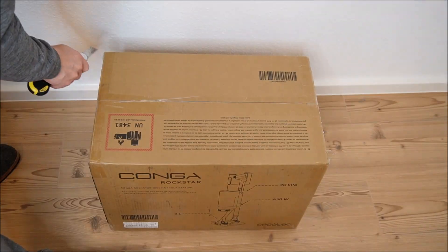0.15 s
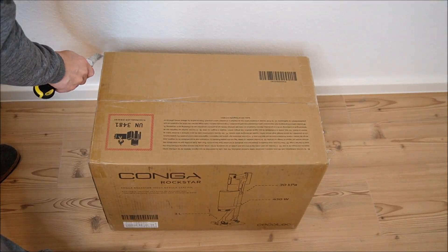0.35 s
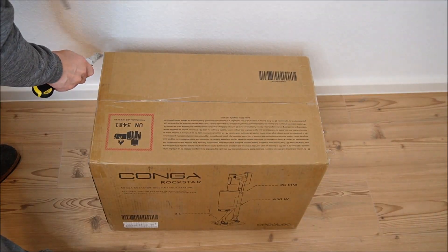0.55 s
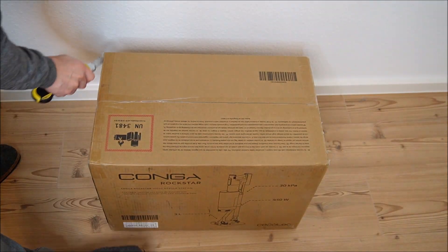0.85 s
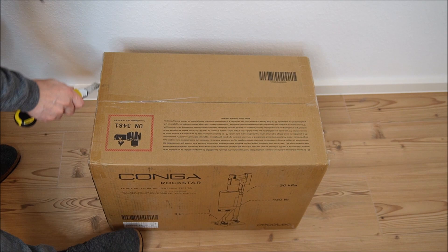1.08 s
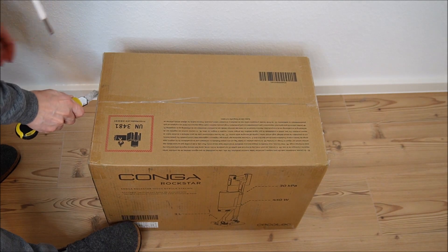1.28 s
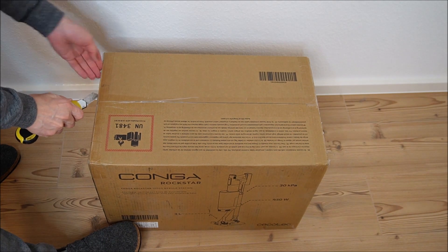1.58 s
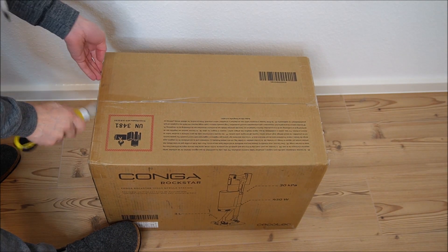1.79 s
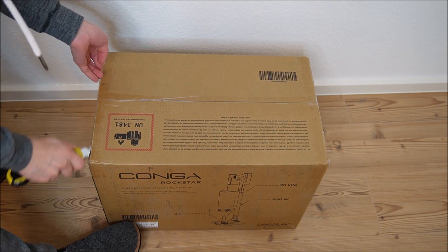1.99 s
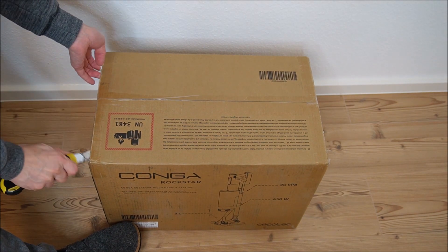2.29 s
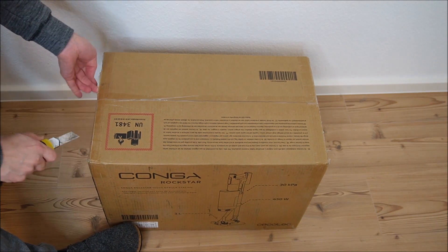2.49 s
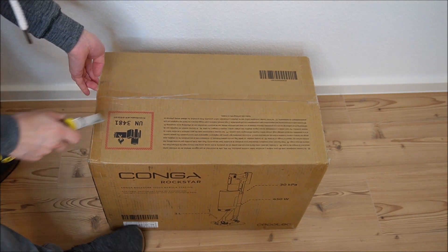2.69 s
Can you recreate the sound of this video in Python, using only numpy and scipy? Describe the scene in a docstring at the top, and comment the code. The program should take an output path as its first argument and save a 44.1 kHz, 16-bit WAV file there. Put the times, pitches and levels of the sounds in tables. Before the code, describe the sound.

Close sound of a blade cutting a taped cardboard box indoors; quiet at first, then two bursts of gritty tearing and clacking, a lull with faint scratches and chirps, finally loud thumping knocks on the hollow box.

```python
"""Soft low bumps and a cloth rustle come first; then a box cutter works along the tape of a cardboard box.
The box stands on a wooden floor in a small bare room. Each stroke tears fibres and tape:
a dense rain of tiny jolts rings the box wall and its hollow; the tape adds snaps and hiss.
The blade knocks and ticks on the box and chirps as it slips; hand pushes thump single panels.
Room echo, quiet air and a low rumble lie underneath."""
import sys
import numpy as np
from scipy import signal
from scipy.fft import rfft, irfft, next_fast_len
from scipy.io import wavfile
from scipy.ndimage import map_coordinates

SR = 44100
rng = np.random.default_rng(int(sys.argv[2]) if len(sys.argv) > 2 else 0)


def file_out(sig):
    """Save sig as 16-bit WAV at sys.argv[1]."""
    # one column per channel
    cols = np.atleast_2d(sig).T
    # limit, then scale
    lim = np.clip(cols, -1, 1)
    pcm = np.round(lim * 32767).astype(np.int16)
    wavfile.write(sys.argv[1], SR, pcm)


def nominal_scale(level):
    """Amplitude ratio for a level in decibels (scalar or array-like)."""
    x = np.asarray(level, float) / 20
    return 10 ** x


N = 125685

# one list a stretch of scraping, a stroke or part of one:
# t/s, blade pressure/dB, tape sizzle over it/dB, drumming of the hollow over it/dB
SCRAPE_STRETCHES = [
    [(0.641, -33, -23, 3), (0.647, -49.5, -19, 3), (0.663, -38, -15, -8), (0.671, -48.5, -1, 1),
     (0.681, -42, -7, -6), (0.695, -45, -16, -8)],
    [(0.695, -42, -2.5, -1.5), (0.719, -43, -4.5, -9), (0.732, -44, -5, -3)],
    [(0.732, -47, -10, 0.5), (0.77, -68, -19, 8)],
    [(0.842, -48, -10, -4), (0.845, -42, 0, -13)],
    [(0.85, -40, -9, -8), (0.856, -51, -6, 0), (0.866, -34.5, -6, -1), (0.871, -31.5, -9.5, -10),
     (0.904, -36, -6.5, -0.5), (0.915, -37, -3, 8)],
    [(0.915, -35, 7, -11), (0.923, -27, -6, -5), (0.959, -36, -2.5, -2.5), (0.971, -31.5, -8, -7.5),
     (1.029, -47.5, -2.5, 8), (1.04, -57, -11, 0)],
    [(1.05, -42.5, -7, 6), (1.066, -41.5, -1, 9.5), (1.08, -24, -8.5, -5.5), (1.108, -36, 1.5, 2)],
    [(1.116, -27, -0.5, 5), (1.119, -27, -4, 2), (1.134, -37, 2.5, 3)],
    [(1.137, -29, -12, 6), (1.142, -22.5, -12, -5), (1.149, -26.5, 1, -4), (1.163, -34.5, -4, 2),
     (1.191, -29, -2, -3.5), (1.211, -43.5, 3, 9), (1.27, -56.5, 3.5, 9.5)],
    [(1.633, -47, 1, 3), (1.641, -45.5, -1.5, 3.5), (1.677, -33, -3, -4.5), (1.693, -43.5, -4, -1),
     (1.7, -37, -3, -9)],
    [(1.7, -36.5, -5, -0.5), (1.716, -35.5, -2, -5), (1.726, -42.5, -1, 4), (1.748, -39, -12, -9),
     (1.752, -44, -1, 0.5), (1.826, -51.5, -4, -0.5), (1.835, -54, 7, 5)],
    [(1.842, -39, -5, 3.5), (1.86, -21.5, -4, -3), (1.892, -35.5, 4, -1), (1.903, -39, -17, 7)],
    [(1.903, -47, -26, 4), (1.909, -42, -5, 3), (2.087, -42.5, -2.5, -3), (2.1, -36.5, -13, -8),
     (2.106, -35.5, -16, -11), (2.119, -52, 0, 8), (2.17, -60.5, -1, 7)],
    [(2.339, -51, 15, -5), (2.345, -52.5, 11, -19), (2.355, -48.5, -2, -13), (2.379, -44.5, -4, -5),
     (2.419, -46.5, 2.5, -6.5), (2.427, -49.5, -5, -2), (2.443, -59, 5, 0), (2.46, -51, -7, -4)],
    [(2.46, -54, -2, -13), (2.478, -57.5, 1, 3), (2.496, -46, -5.5, -0.5), (2.566, -55.5, 4.5, -8),
     (2.578, -43.5, -17, -12), (2.586, -56, -6, 2.5), (2.6, -55, -17, 1)],
    [(2.66, -56, -6, -4), (2.672, -73, -3, 7), (2.688, -53, -4, -3), (2.708, -58.5, -3, -8),
     (2.712, -46, -10, -4)],
    [(2.72, -39, -11, 7), (2.736, -45, -6, 0), (2.748, -51.5, -3, 2), (2.768, -55, -4, 3)],
    [(2.774, -32, -26, 2), (2.783, -42, -15, -3), (2.8, -52, 7, 6)],
    [(2.801, -36, -13, 6), (2.807, -31.5, -14, 0), (2.817, -40, -6, 12)],
    [(2.828, -27, -10, 5), (2.837, -35, -3, 10.5), (2.85, -37, 1, -6)],
]
# blade striking the box: t/s, wall peak/dB, push on the hollow over it/dB, contact decay/s, treble crack over it/dB
BLADE_KNOCKS = [(0.637, -23, -13, 0.0011, -33), (0.661, -36.5, -25, 0.0023, 1),
                (0.8468, -22, -21, 0.00081, -16), (0.871, -31, -12, .001, -7), (0.966, -25, -7, 0.0016, -6),
                (1.084, -13.5, -16, 0.001, -24), (1.0935, -20, -13, .001, -19),
                (1.1154, -22, -13, .0015, -23), (1.1188, -16, -23, 0.0014, -31),
                (1.126, -25.5, 1.5, 0.0016, -18), (1.188, -18.5, -11, .001, -12),
                (1.143, -17, -12, 0.0008, -16), (1.145, -21, -7, 0.001, -17),
                (1.1493, -17, -11, 0.00092, -18), (1.154, -16.5, -9, .001, -16),
                (1.716, -25.5, -5.5, 0.0011, -12), (1.745, -27.5, -25, 0.00074, -2),
                (1.861, -14.5, -7, 0.0005, -15), (1.8636, -13, -6.5, 0.0013, -3.5),
                (2.1028, -17.5, -12, 0.0011, -8), (2.1051, -20.5, -14, 0.00076, -14),
                (2.321, -39, -10, 0.0077, -1), (2.578, -46, -20, .001, -10), (2.591, -46, -14, .001, -8),
                (2.686, -46, -11, 0.003, -4), (2.7126, -27, -12, 0.0012, -11),
                (2.7138, -15.5, -24, 0.00099, -4.5), (2.717, -22, -15, 0.00089, -21),
                (2.7194, -26, -10, 0.001, -12), (2.771, -20.5, -16, .001, -34),
                (2.7721, -17.5, -13, 0.00085, -29), (2.7746, -32, -7, 0.0011, -22),
                (2.818, -14.5, -16, 0.0012, -12), (2.82, -6.5, -13.5, 0.0008, -17),
                (2.8231, -9, -17, 0.00072, -15), (2.826, -8.5, -15, 0.0015, -6),
                (2.839, -34, -1, 0.00083, -14)]
# bright ticks of blade and lifting tape: t/s, approximate peak/dB, f/Hz
BLADE_TICKS = [(0.401, -48, 5960), (0.922, -31, 3150), (0.9484, -25, 12700), (0.956, -31, 6490),
               (1.009, -26, 12100), (1.055, -27, 12300), (1.1854, -15, 13500), (1.1952, -15.5, 10000),
               (1.2104, -32, 5850), (1.2906, -33.5, 5730), (1.3098, -38, 5960), (1.3564, -33, 5080),
               (1.3754, -28.5, 13800), (1.4333, -42, 6260), (1.4996, -44.5, 6670), (1.5424, -43.5, 5800),
               (1.6115, -40, 4540), (1.688, -31, 5650), (1.745, -23.5, 5800), (1.795, -36, 11800),
               (2.133, -36.5, 6470), (2.193, -27.5, 5600), (2.2654, -68, 5590), (2.29, -34.5, 10900),
               (2.3022, -42, 5660), (2.319, -33, 8350), (2.3284, -35, 13100), (2.4194, -35, 10860),
               (2.4735, -40, 5700), (2.575, -37, 5830)]
# hand pushes that ring one panel: t/s, level before the soft rise/dB, f/Hz, t60/s
PANEL_THUMPS = [(0.016, -45.5, 316, 0.064), (0.158, -47, 240, 0.094), (.638, -31.5, 199, 0.13),
                (.796, -35.5, 262, 0.22), (1.17, -36.5, 97, 0.39), (1.665, -29, 245, 0.14),
                (1.869, -37, 90, 0.35), (1.938, -38, 116, 0.2), (2.104, -24, 315, 0.055),
                (2.374, -35, 356, 0.13), (2.487, -44, 302, 0.076), (2.674, -42, 313, 0.067),
                (2.714, -19.5, 318, 0.055), (2.708, -29, 96, 0.12), (2.8197, -8.5, 314, 0.074)]
# chirps of the slipping blade: t/s, level before the soft rise/dB, f/Hz, t60/s
SLIP_CHIRPS = [(.868, -32.5, 6640, 0.078), (2.341, -31.5, 9060, 0.038), (2.342, -35.5, 4420, 0.03),
               (2.343, -30, 13400, 0.033), (2.346, -31, 10850, 0.028), (2.348, -35, 6280, 0.069),
               (2.425, -33.5, 2170, 0.038), (0.968, -31, 2400, .1), (2.575, -26, 3950, 0.014),
               (2.631, -36.5, 2180, 0.017), (2.68, -46.5, 3700, 0.04)]
# stiff wall by the blade: f/Hz, width/Hz, level/dB
WALL_MODES = [(1214, 207, -2.5), (1426, 282, 2.5), (1666, 316, 2), (1863, 310, 2.5), (2019, 233, 1),
              (2186, 390, -4.5), (2383, 180, 0), (2940, 650, -7), (3190, 370, -12), (3560, 270, -12),
              (3850, 890, -8), (4420, 300, -15.5), (5750, 960, -16.5)]
# the box's air and panels: f/Hz, width/Hz, level/dB
HOLLOW_MODES = [(97, 80, -11.5), (188, 56, -1.5), (245, 64.6, 1.5), (318, 117, -2.5), (387, 58, -1.5),
                (460.4, 72, -3.5), (700, 110, -14), (958, 120, -16)]
# spectrum of the tape's sizzle: f/Hz, relative level per Hz/dB
TAPE_SPECTRUM = [(2940, -6), (5000, 3.5), (7670, -4), (8860, -1.5), (13300, -1), (15800, -4.5),
                 (16400, -36)]
# echo decay of the room: f/Hz, t60/s
ROOM_DECAY = [(100, 0.89), (400, 0.53), (2000, 0.41), (6000, 0.48), (14000, 0.18)]
# soft low bumps through the floor: t/s, level/dB, width/s
FLOOR_BUMPS = [(0.021, -48, 0.0025), (.045, -43.5, 0.0032), (0.061, -46, 0.0046), (.085, -40.5, 0.0028),
               (.165, -44, 0.00062), (.19, -45, 0.0021), (.233, -47.5, 0.0031), (.3, -47.5, 0.0048),
               (.375, -57, 0.0057), (.7, -53, 0.0049), (.81, -41, 0.0024), (0.549, -59, 0.0033),
               (.572, -63, 0.0084)]
# rustle of a sleeve: t/s, level/dB
SLEEVE_LEVEL = [(0.0, -67.5), (0.05, -46), (0.078, -54), (0.264, -73), (0.268, -66), (0.3, -80)]
# spectrum of the cloth: f/Hz, relative level per Hz/dB
CLOTH_SPECTRUM = [(120, -42), (200, -2), (548, -1), (1710, -20), (3130, -13), (4040, -8.5), (14600, -18.5),
                  (16000, -28)]
# spectrum of the quiet room: f/Hz, relative level per Hz/dB
AIR_SPECTRUM = [(59, -48), (100, -12), (400, -3), (551, -3), (668, -8), (1540, -12), (1860, -9),
                (4370, -17), (6020, -18.5), (8650, -24.5), (14700, -23.5), (16400, -45)]
# low rumble, before its lumps: t/s, level/dB
RUMBLE_LEVEL = [(0, -57.5), (1, -75), (2.85, -68)]

JOLTS_PER_S, JOLT_SPREAD_DB = 9000, 0.5
CRACKLES_PER_S, CRACKLE_SPREAD_DB, CRACKLE_DB = 600, 2, -9  # single fibres, over the dense tearing
SNAPS_PER_S, SNAP_SPREAD_DB, HISS_POWER_SHARE = 8300, 3.5, 0.28
CLUMPS_PER_S, CLUMP_DB, LARGEST_SPREADS = 250, 2.5, 3.5  # the last caps a jolt
SCRAPE_EDGE_S = 0.0013
SHIFT_S, SHIFT_SHARE, SHIFT_DB = 0.02, 0.025, 2.5  # interval; random spread of pitch and level
BLOW_WIDTH_SHARE, BLOW_SOFT_HZ, BLOW_LOWEST_HZ = 0.69, 3620, 1200  # rings longer, duller than a scrape
FIRST_PUSH, FIRST_PUSH_S = 1.6, 0.00007  # size over the rough contact; decay
CRACK_LOW_HZ, CRACK_HIGH_HZ = 2980, 7900
TICK_T60_S, TICK_WIDTH_SHARE = 0.015, 0.77  # width over pitch
THUMP_RISE_CYCLES, THUMP_WAVER, THUMP_SAG_PER_S = 0.6, 0.0036, 1.7  # sag: share of pitch per s
CHIRP_RISE_S, CHIRP_WAVER = 0.0013, 0.0014
BOX_LOWEST_HZ = 75  # the box radiates little below this
ROOM_DB, ROOM_DELAY_S = -11, 0.006
AIR_DB = -59.5
RUMBLE_HZ, RUMBLE_LUMP_DB = 90, 3
TOP_HZ, ABOVE_TOP_DB = 15450, -28


def unit(x):
    """Scales to rms 1."""
    return x / np.sqrt(np.mean(x ** 2) + 1e-20)


def along(points, hz):
    """Interpolates (Hz, value) points on a log frequency axis."""
    f, value = np.transpose(points)
    return np.interp(np.log(hz + 1), np.log(f + 1), value)


def filtered(x, response):
    """Multiplies the spectrum of x by a complex response of frequency."""
    size = next_fast_len(len(x) + 8192)
    return irfft(rfft(x, size) * response(np.fft.rfftfreq(size, 1 / SR)), size)[:len(x)]


def coloured(x, spectrum):
    """Shapes x with a (Hz, dB) spectrum."""
    return filtered(x, lambda f: nominal_scale(along(spectrum, f)))


def body(x, modes, flip=-1):
    """Parallel resonances of unit gain for noise; signs alternate at flip=-1, all start together at flip=1."""
    def ring(f):
        total = 0
        for k, (hz, width, db) in enumerate(modes):
            damping = 1j * f * width
            total = total + flip ** k * nominal_scale(db) * damping / (hz * hz - f * f + damping)
        return total

    mean_gain = np.sqrt(np.mean(np.abs(ring(np.linspace(0, SR / 2, num=4096))) ** 2))
    return filtered(x, ring) / mean_gain


def add(track, s, sound):
    """Mixes a sound into the track at s seconds."""
    part = track[round(s * SR):][:len(sound)]
    part += sound[:len(part)]


def jolts(per_s, spread_db):
    """Random one-sample jolts of uneven size and either sign, in loose clumps, rms 1."""
    when, sign, size = rng.random((3, N))
    clumps = map_coordinates(rng.standard_normal(N // 40), [np.arange(N) * CLUMPS_PER_S / SR])
    size_db = spread_db * np.minimum(-np.log(size + 1e-9), LARGEST_SPREADS) + CLUMP_DB * clumps
    return unit((when < per_s / SR) * np.sign(sign - 0.5) * nominal_scale(size_db))


def shifting(x, modes):
    """A body whose resonances are redrawn every SHIFT_S as the point of contact travels."""
    out, hop = np.zeros(N), round(SHIFT_S * SR)
    for start in range(0, N, hop):
        draws = rng.standard_normal((len(modes), 2))
        now = [(hz * (1 + SHIFT_SHARE * a), width, db + SHIFT_DB * b)
               for (hz, width, db), (a, b) in zip(modes, draws)]
        piece = np.pad(x[start:start + hop], (0, 4000))  # room to ring on
        add(out, start / SR, body(piece, now))
    return out


def strokes():
    """Blade pressure sets how hard tearing jolts drive wall and hollow; tape adds fine snaps and hiss."""
    t = np.arange(N) / SR
    press, drum, sizzle = np.zeros((3, N))
    for rows in SCRAPE_STRETCHES:
        s, press_db, tape_db, drum_db = np.transpose(rows)
        gate = np.clip(np.minimum(t - s[0], s[-1] - t) / SCRAPE_EDGE_S + 0.5, 0, 1)
        pressure = gate * nominal_scale(np.interp(t, s, press_db))
        press += pressure
        drum += pressure * nominal_scale(np.interp(t, s, drum_db))
        sizzle += pressure * nominal_scale(np.interp(t, s, tape_db))
    crackle = nominal_scale(CRACKLE_DB) * jolts(CRACKLES_PER_S, CRACKLE_SPREAD_DB)
    tearing = unit(jolts(JOLTS_PER_S, JOLT_SPREAD_DB) + crackle)
    snaps = np.sqrt(1 - HISS_POWER_SHARE) * jolts(SNAPS_PER_S, SNAP_SPREAD_DB)
    hiss = np.sqrt(HISS_POWER_SHARE) * rng.standard_normal(N)
    tape = unit(coloured(snaps + hiss, TAPE_SPECTRUM))
    return shifting(press * tearing, WALL_MODES) + shifting(drum * tearing, HOLLOW_MODES) + sizzle * tape


def knocks():
    """A sharp jolt and short rough contact ring the wall, crack in the treble and push the hollow."""
    ring, crack, push = np.zeros((3, N))
    t = np.arange(2600) / SR

    def low_cut(f):
        return (-f * f / (BLOW_LOWEST_HZ ** 2 - f * f + 1.2j * f * BLOW_LOWEST_HZ)) ** 2

    def crack_band(f):
        return 1j * f / (CRACK_LOW_HZ + 1j * f) / (1 + 1j * f / CRACK_HIGH_HZ)

    for s, db, push_db, contact_s, crack_db in BLADE_KNOCKS:
        rough = rng.standard_normal(len(t)) * np.exp(-t / contact_s)
        contact = rough + FIRST_PUSH * np.exp(-t / FIRST_PUSH_S)
        # each blow weights the wall modes a little differently
        wall = []
        for (hz, width, level), d in zip(WALL_MODES, rng.standard_normal(len(WALL_MODES))):
            soft_db = 10 * np.log10(1 + (hz / BLOW_SOFT_HZ) ** 2)
            wall.append((hz, width * BLOW_WIDTH_SHARE, level + SHIFT_DB * d - soft_db))
        blow = filtered(body(contact, wall, flip=0.97), low_cut)
        add(ring, s, nominal_scale(db) * blow / np.abs(blow).max())
        add(crack, s, nominal_scale(db + crack_db) * contact)
        add(push, s, nominal_scale(db + push_db) * np.exp(-t / 0.0002))
    return ring + filtered(crack, crack_band) + body(push, HOLLOW_MODES)


def ticks():
    """Tiny dying noise bursts, each through one broad resonance at its pitch."""
    out, t = np.zeros(N), np.arange(3000) / SR
    for s, db, hz in BLADE_TICKS:
        burst = rng.standard_normal(len(t)) * nominal_scale(-60 * t / TICK_T60_S)
        # 7.5 dB: from rms to about the peak
        add(out, s, nominal_scale(db - 7.5) * body(burst, [(hz, hz * TICK_WIDTH_SHARE, 0)]))
    return out


def dying_tone(t, db, hz, t60_s, rise_s, waver, bend=0):
    """A sine with a soft rise, exponential fall and random-walk phase; bend adds phase in radians."""
    phase = bend + np.cumsum(rng.standard_normal(len(t))) * waver * np.sqrt(hz)
    envelope = nominal_scale(db - 60 * t / t60_s) * (1 - np.exp(-t / rise_s))
    return envelope * np.sin(2 * np.pi * hz * t + phase)


def thumps():
    """A push rings one panel; its pitch sags for 0.1 s, then returns to the table's."""
    out, t = np.zeros(N), np.arange(SR // 2) / SR
    for s, db, hz, t60_s in PANEL_THUMPS:
        sag = -np.pi * hz * THUMP_SAG_PER_S * np.minimum(t, 0.1) ** 2
        add(out, s, dying_tone(t, db, hz, t60_s, THUMP_RISE_CYCLES / hz, THUMP_WAVER, sag))
    return out


def chirps():
    """The slipping blade sounds short, slightly unsteady tones."""
    out, t = np.zeros(N), np.arange(SR // 2) / SR
    for s, db, hz, t60_s in SLIP_CHIRPS:
        add(out, s, dying_tone(t, db, hz, t60_s, CHIRP_RISE_S, CHIRP_WAVER))
    return out


def room(x):
    """Noise-tail echo, each frequency dying at its own speed; redrawn every 1/8 s as the hand moves."""
    out, hop = np.zeros(N), SR // 8
    for start in range(0, N, hop):
        hz, t, z = signal.stft(rng.standard_normal(SR // 2), SR, nperseg=256)
        decay = nominal_scale(-60 * t / along(ROOM_DECAY, hz)[:, None])
        tail = signal.istft(z * decay, SR, nperseg=256)[1]
        echo = signal.fftconvolve(x[start:start + hop], tail / np.linalg.norm(tail))
        add(out, start / SR + ROOM_DELAY_S, echo)
    return out


def bumps():
    """Each bump through the floor is one swing of pressure, up then down."""
    t = np.arange(N) / SR
    return sum(nominal_scale(db) * 2 * (s - t) / w * np.exp(-((t - s) / w) ** 2) for s, db, w in FLOOR_BUMPS)


def rustle():
    """Sleeve friction: coloured noise under a brief level curve."""
    s, db = np.transpose(SLEEVE_LEVEL)
    level = nominal_scale(np.interp(np.arange(N) / SR, s, db, right=-120))
    return level * unit(coloured(rng.standard_normal(N), CLOTH_SPECTRUM))


def air():
    """Steady coloured noise of the quiet room."""
    return nominal_scale(AIR_DB) * unit(coloured(rng.standard_normal(N), AIR_SPECTRUM))


def rumble():
    """Low-passed noise of uneven level, mostly below the lowest panel."""
    t = np.arange(N) / SR
    lumps = map_coordinates(rng.standard_normal(100), [t * 25])
    low = unit(filtered(rng.standard_normal(N), lambda f: (f > 15) / (1 + (f / RUMBLE_HZ) ** 4)))
    return nominal_scale(np.interp(t, *np.transpose(RUMBLE_LEVEL)) + RUMBLE_LUMP_DB * lumps) * low


def scene():
    """Box sounds with the box's low cut, their echo and the background."""
    sources = strokes() + knocks() + ticks() + thumps() + chirps()
    box = filtered(sources, lambda f: (1j * f / (BOX_LOWEST_HZ + 1j * f)) ** 2)
    background = bumps() + rustle() + air() + rumble()
    return (box + nominal_scale(ROOM_DB) * room(box) + background)[None]


def low_pass(x):
    """Removes everything above the highest recorded frequency."""
    return signal.sosfilt(signal.butter(12, 16890, fs=SR, output="sos"), x)


def record(dry):
    """Weakens the highest treble in one step at TOP_HZ."""
    mix = filtered(dry[0], lambda f: nominal_scale(ABOVE_TOP_DB * (f > TOP_HZ)))[None]
    return low_pass(mix)


dry = scene()
out = record(dry)
file_out(out)
```